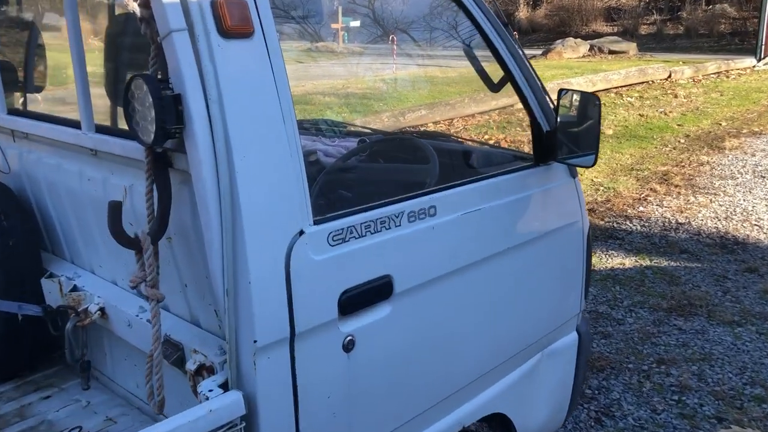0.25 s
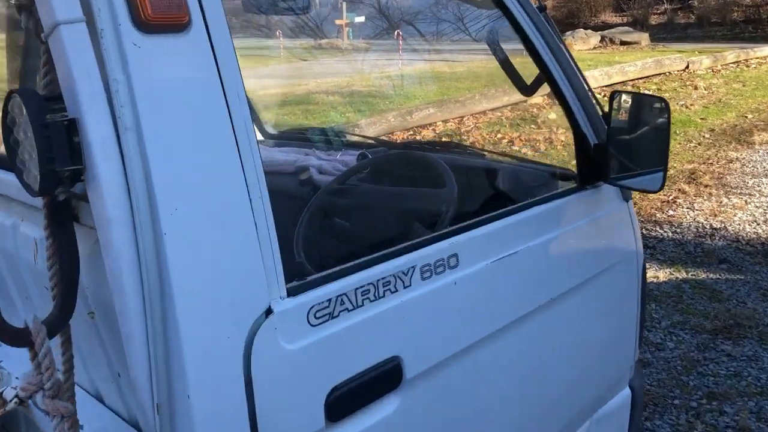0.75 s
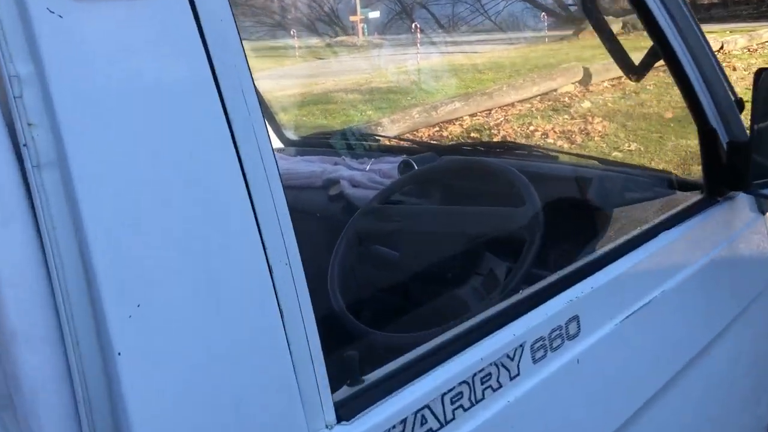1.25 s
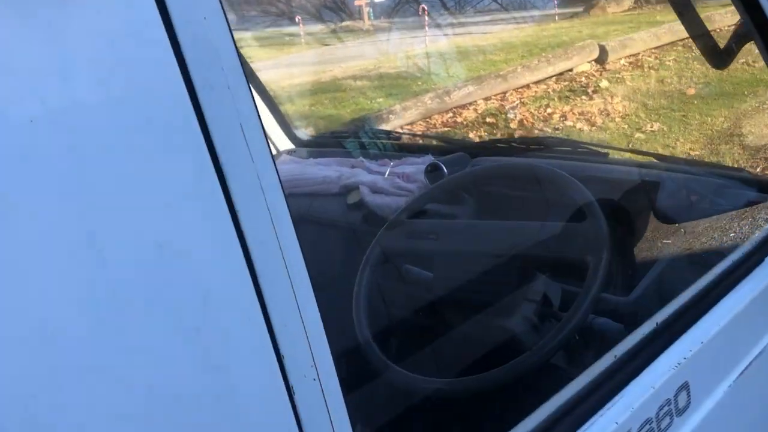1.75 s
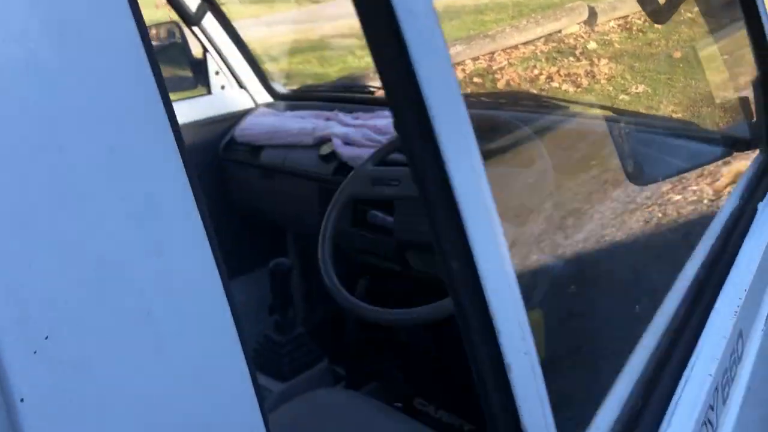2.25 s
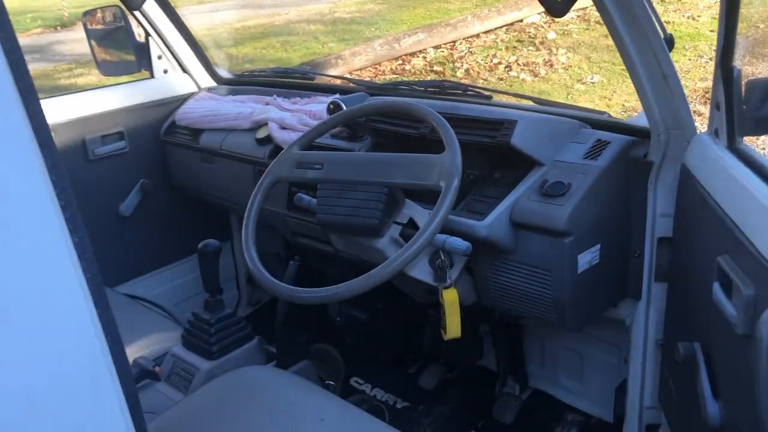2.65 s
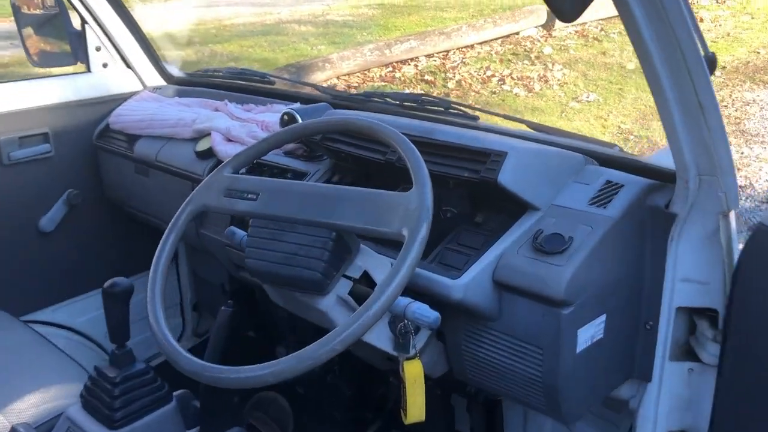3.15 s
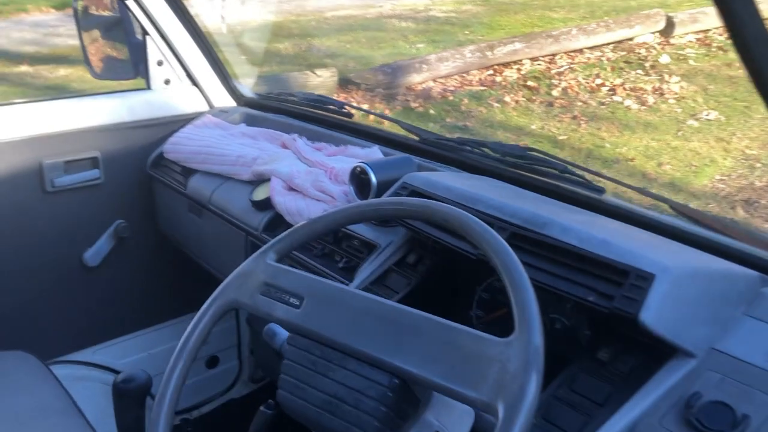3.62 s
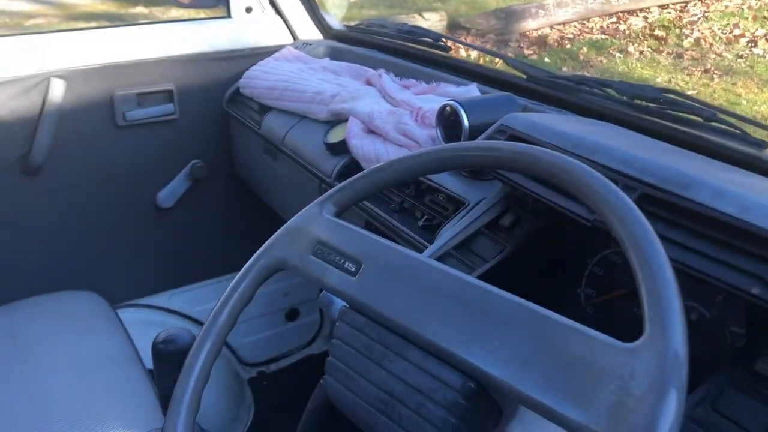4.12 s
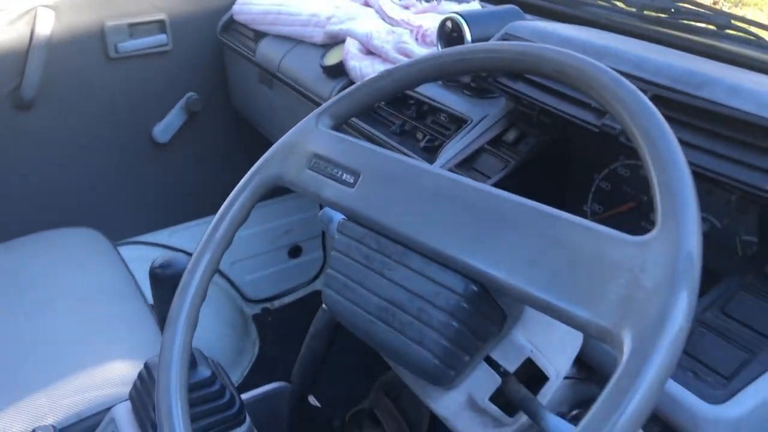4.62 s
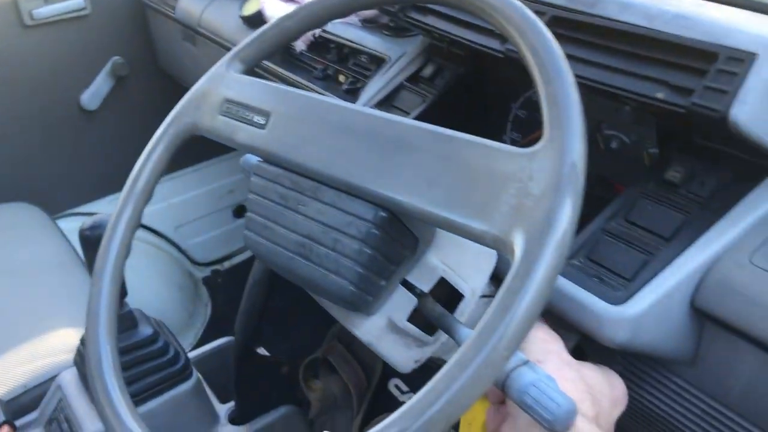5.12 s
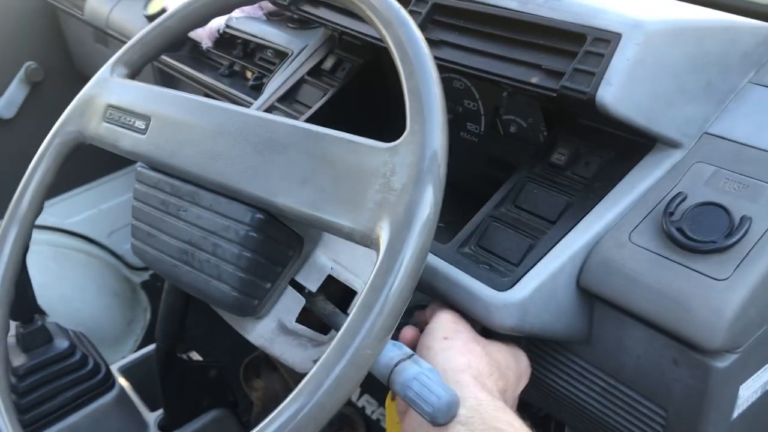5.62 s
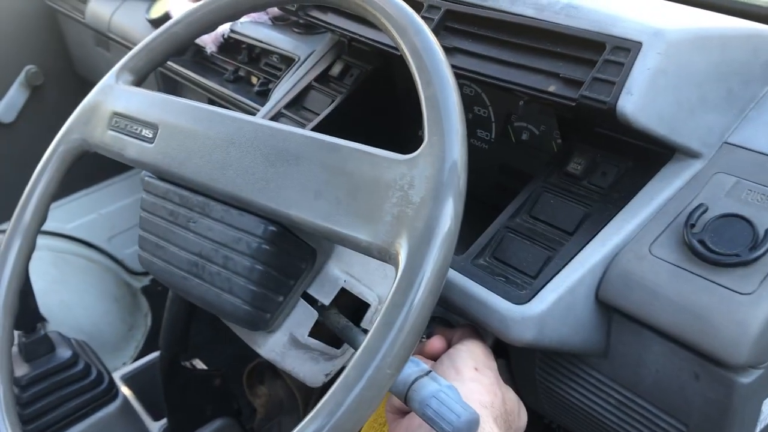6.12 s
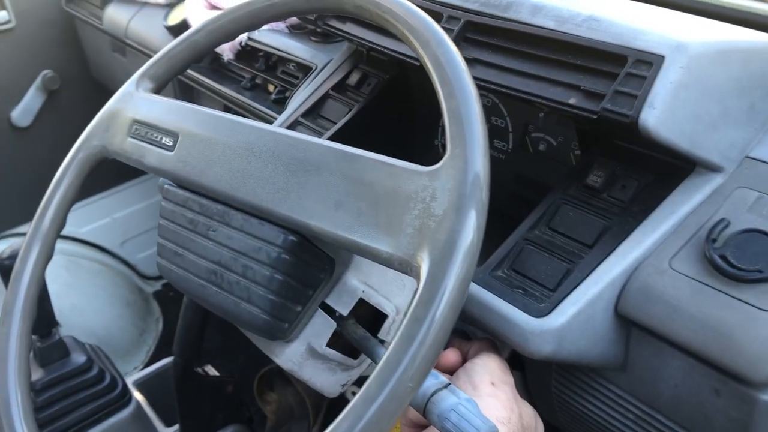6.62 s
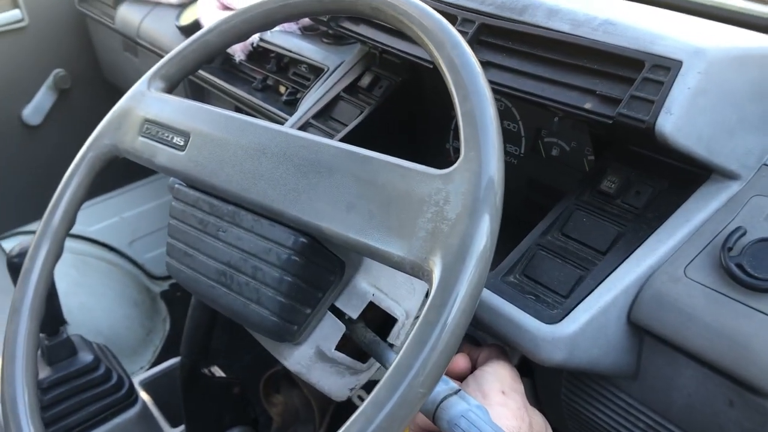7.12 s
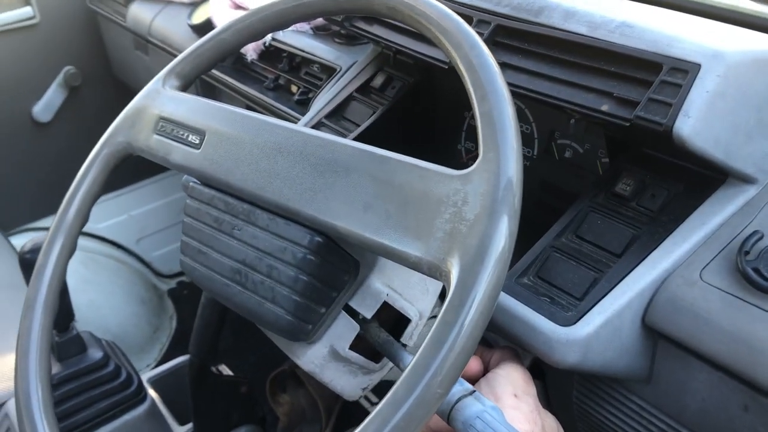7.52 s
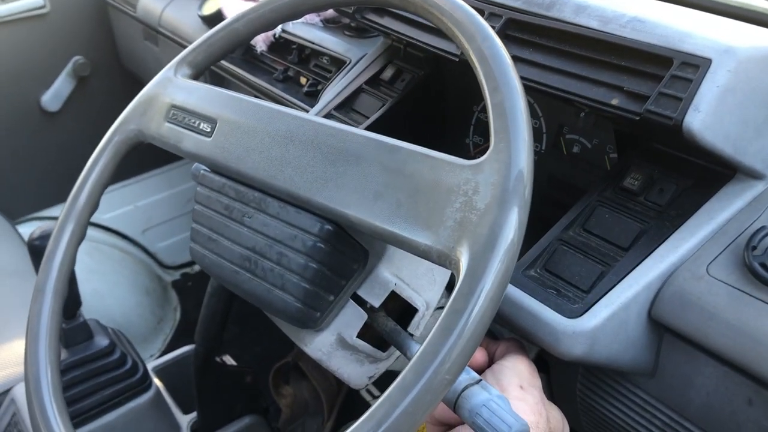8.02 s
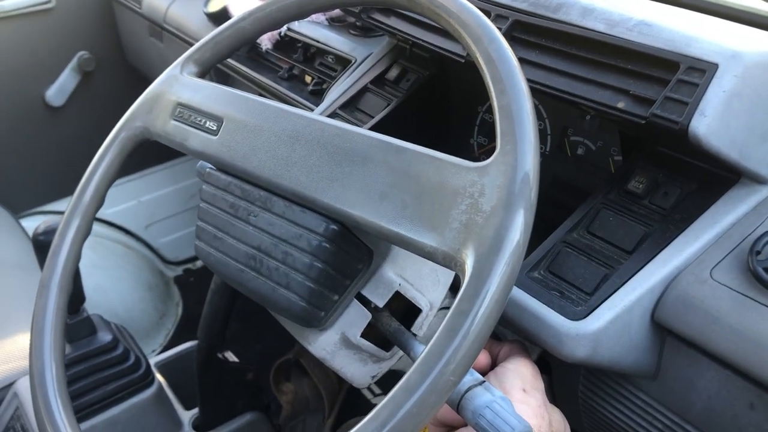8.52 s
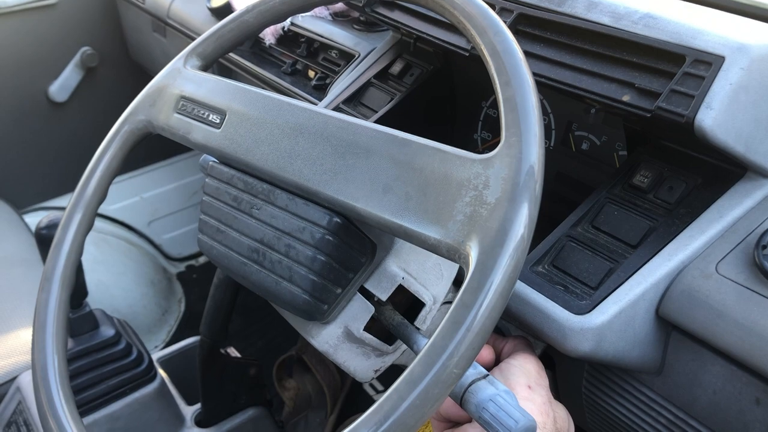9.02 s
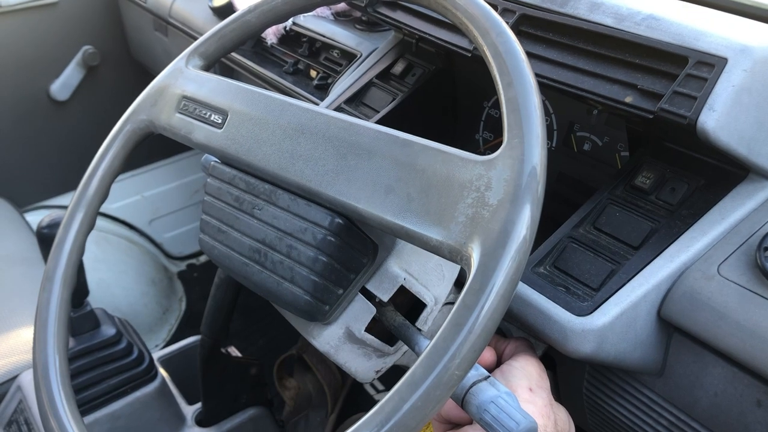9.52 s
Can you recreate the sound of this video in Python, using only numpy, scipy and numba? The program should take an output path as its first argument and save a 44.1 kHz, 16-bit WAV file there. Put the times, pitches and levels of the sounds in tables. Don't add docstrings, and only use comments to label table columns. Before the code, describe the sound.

Close handheld microphone in a quiet open yard. Gravel crunches underfoot while geese honk far away. A door latch releases with a very loud metallic bang, the door swings and knocks against its stop, then bumps, rustling and seat creaks follow. The starter clunks in, whirs and grinds in uneven surges, bogs down and stalls, then heaves briefly two more times without the engine catching.

```python
import sys
import numpy as np
from scipy import signal
from scipy.fft import rfft, irfft
from scipy.io import wavfile
from scipy.ndimage import uniform_filter1d
from numba import njit

SR = 44100
rng = np.random.default_rng(int(sys.argv[2]) if len(sys.argv) > 2 else 0)


def dump_mix(stems):
    frames = np.atleast_2d(stems).T
    limited = np.clip(frames, -1, 1)
    pcm = np.round(limited * 32767).astype(np.int16)
    wavfile.write(sys.argv[1], SR, pcm)


def voltage_ratio(level):
    return 10 ** (np.asarray(level, float) / 20)


N = 430416
T = np.arange(N) / SR


def level(x, db):
    return x * voltage_ratio(db) / np.sqrt(np.mean(x ** 2))


@njit
def svf(x, hz, width):
    y, b, l = np.empty(len(x)), 0., 0.
    g, k = np.tan(np.pi * hz / SR), width / hz
    for i in range(len(x)):
        v = (b + g * (x[i] - l)) / (1 + g * (g + k))
        b, l, y[i] = 2 * v - b, l + 2 * g * v, k * v
    return y


def band(x, hz, width):
    return level(svf(svf(x, hz, width), hz, width), 0)


def colour(x, points):
    hz, db = np.transpose(points)
    log_f = np.log(np.maximum(np.arange(len(x) // 2 + 1) * SR / len(x), 1))
    curve = voltage_ratio(np.interp(log_f, np.log(hz), db))
    return level(irfft(rfft(x) * curve, len(x)), 0)


def walk(rate, count=N):
    k = int(SR / rate)
    held = np.repeat(rng.standard_normal(count // k + 1), k)
    return 1.55 * uniform_filter1d(uniform_filter1d(held, k), k)[:count]


def body(x, modes, sway_db=0):
    out = np.zeros(len(x))
    for k, (hz, width, db) in enumerate(modes):
        gain = voltage_ratio(db + sway_db * walk(22, count=len(x)))
        out += (-1) ** k * gain * svf(x, float(hz), max(float(width), 4.0))
    return level(out, 0)


def grains(count, spread_db):
    size_db = spread_db * np.minimum(rng.exponential(size=count), 7)
    return level(rng.standard_normal(count) * voltage_ratio(size_db), 0)


def fade(t, t60):
    return np.exp(-np.log(1000) * t / max(t60, .004))


def ring(t, modes):
    y = np.zeros(len(t))
    for hz, db, t60 in modes:
        y += voltage_ratio(db) * fade(t, t60) * np.sin(2 * np.pi * (hz * t + rng.random()))
    y *= np.minimum(t / 0.0012, 1)
    return y / np.abs(y).max()


def spray(t, t60):
    tint_db = 3.5 * rng.standard_normal(4)
    points = [(900, -17.0), (2500, 2), (7000, 1), (16000, -6.5)]
    grit = colour(grains(len(t), 2.2), np.add(points, np.outer(tint_db, [0, 1])))
    return grit * fade(t, t60) * np.minimum(t / 0.0029, 1)


def add(out, s, x):
    i = int(s * SR)
    out[i:i + len(x)] += x[:N - i]


def yard():
    # hz, level_db [dB per Hz]
    yard_curve = [(50, -4.5), (100, 2), (220, -4), (450, -11.5), (600, -16.5), (2000, -24.5), (8000, -32.5),
                  (15500, -36.5)]
    # time_s, level_db
    gusts = [(0, -67), (.65, -59.5), (1.3, -64), (2.8, -62), (3.9, -60), (5.6, -68), (5.87, -52.5),
             (6.1, -60.5), (9.0, -66.5), (9.12, -56), (9.76, -69)]
    s, db = np.transpose(gusts)
    gust_db = np.interp(T, s, db) + 2.2 * walk(5.5)
    wind = band(rng.standard_normal(N), 58., 60.) * voltage_ratio(gust_db)
    drift_db = .6 * walk(3)
    return colour(rng.standard_normal(N), yard_curve) * voltage_ratio(-65 + drift_db) + wind


def insect():
    # start_s, pitch_hz, width_hz
    trill = (9.38, 9000, 350)
    start, hz, width = trill
    tone = band(rng.standard_normal(N), float(hz), float(width))
    return tone * voltage_ratio(-90.5 + 3.1 * walk(12)) * (T > start)


def geese():
    # start_s, length_s, pitch_hz, level_db
    honks = [(0.03, 0.079, 758, -62.5), (0.3, 0.086, 759, -66.5), (.47, 0.12, 759, -61),
             (.76, 0.086, 735, -67.5), (0.93, 0.077, 749, -61.5), (1.28, 0.098, 727, -68),
             (.02, 0.046, 1060, -60.5), (.3, 0.05, 1133, -60.5), (.75, 0.055, 1048, -63),
             (.9, 0.049, 1080, -61.5), (1.38, 0.12, 1107, -69)]
    harmonics_db = [1, 6, -12.5]
    arch, sag, roughness = .05, .07, .3
    out = np.zeros(N)
    for s, length, pitch_hz, db in honks:
        t = T[:int(length * SR)]
        swell = np.sin(np.pi * t / length)
        hz = pitch_hz * (1 + arch * (swell - .6) - sag * (t / length - .5))
        phase = 2 * np.pi * np.cumsum(hz) / SR
        voice = np.zeros(len(t))
        for k, harmonic_db in enumerate(harmonics_db):
            if k == 0 or pitch_hz < 900:
                voice += voltage_ratio(harmonic_db) * np.sin((k + 1) * phase)
        hoarse = 1 + roughness * band(rng.standard_normal(9000), 70., 120.)[:len(t)]
        add(out, s, voltage_ratio(db) * voice * hoarse * swell)
    t = T[:16000]
    field = level(rng.standard_normal(len(t)) * fade(t, 1.0), -45.0)
    return out + signal.fftconvolve(out, field)[:N]


def scuffing():
    # start_s, hold_s, body_db, hiss_db
    drags = [(0, 1.54, -64, -79), (0.471, 0.093, -54.5, -64), (1.068, 0.23, -56, -61.5),
             (1.4, 0.062, -60.5, -66), (1.615, 0.02, -45.5, -44), (1.624, .03, -43.5, -55),
             (1.687, 0.22, -56.5, -69), (2.0, 1.7, -64.5, -77), (2.65, 0.43, -64.5, -75.5),
             (3.089, 0.22, -52.5, -58), (3.113, 0.024, -47, -50.5), (2.577, 0.095, -59.5, -63.5),
             (3.567, 0.1, -49, -50.5), (3.675, 0.655, -63.5, -67.5), (3.841, 0.29, -57, -62.5),
             (4.505, 0.43, -67.5, -70), (4.943, 0.53, -74, -72), (5.16, 0.23, -67, -68.5),
             (5.73, 0.19, -53.5, -63)]
    attack_s, t60_s = 0.046, 0.12
    low = high = 0
    for s, hold, body_db, hiss_db in drags:
        swell = np.clip((T - s) / attack_s + 1, 0, 1) ** 2
        shape = swell * fade(np.maximum(T - s - hold, 0), t60_s)
        low = np.maximum(low, voltage_ratio(body_db) * shape)
        high = np.maximum(high, voltage_ratio(hiss_db) * shape)
    rustle = band(grains(N, 3.2), 730.0, 1200.0) * voltage_ratio(1.7 * walk(24.87))
    grit = colour(grains(N, 3.6), [(1500, -4.5), (3000, -5), (9000, -2.5), (15000, -8.5)])
    return low * rustle + high * grit * voltage_ratio(1.9 * walk(40))


def ticks():
    # time_s, peak_db
    bright = [(0.471, -33.5), (0.5895, -31.5), (1.3769, -42), (1.6025, -35), (1.62, -28.5), (1.6863, -34.5),
              (1.721, -37), (1.747, -37.5), (1.843, -37), (1.8254, -31), (1.895, -29), (1.9366, -32),
              (2.6444, -25), (3.487, -49), (3.5646, -30.5), (3.7684, -36.5), (3.8825, -35), (4.08, -38),
              (4.206, -39.5), (4.2292, -39.5), (4.4785, -17), (4.6256, -38.5), (4.8341, -38.5),
              (5.5179, -52), (5.5628, -45.5), (8.6383, -57.5), (8.6702, -59)]
    out, t = np.zeros(N), T[:2000]
    for s, db in bright:
        add(out, s, voltage_ratio(db - 10.5) * band(grains(len(t), 1.5), 10000.0, 19000.0) * fade(t, .03))
    return out


def thuds():
    # time_s, peak_db, ring_hz
    blows = [(0.489, -48.5, 217), (0.583, -45.5, 223), (1.251, -48, 314), (1.605, -41.5, 208),
             (1.785, -35.5, 207.2), (1.824, -36.5, 188.5), (1.904, -30, 327.4), (2.282, -43.5, 259.6),
             (2.65, -33.5, 209.6), (2.749, -43.5, 318.4), (2.79, -44.5, 129.3), (2.835, -43, 79.4),
             (2.94, -45.5, 159.4), (4.49, -50, 170.3), (3.961, -48, 139.6), (3.107, -45, 200),
             (3.346, -41, 342.6), (3.571, -43, 306), (3.615, -44, 323), (3.767, -42.5, 198),
             (4.63, -44, 144.4), (5.733, -41.5, 207), (5.82, -34.5, 221)]
    out, t = np.zeros(N), T[:20000]
    for s, db, hz in blows:
        panel = band(rng.standard_normal(len(t)), float(hz), 69.0)
        panel += band(rng.standard_normal(len(t)), 180.0, 340.0)
        add(out, s, voltage_ratio(db - 6.5) * panel * fade(t, 0.47) * np.minimum(t / 0.0061, 1))
    return out


def knocks():
    stones = [(0.459, -40, 961, -58), (0.492, -33, 680, -52), (0.524, -34, 725, -60),
              (0.585, -29, 603, -63), (0.665, -39, 720, -73), (1.103, -36, 820, -48),
              (1.16, -42.5, 606, -50.5), (1.254, -31.5, 770, -45.5), (1.371, -42, 810, -71),
              (1.595, -39, 1283, -48), (1.699, -46, 727, -68), (1.764, -39, 619, -51),
              (1.788, -33, 1950, -47.5), (1.826, -34.5, 655, -48)]
    swing = [
        (2.283, -39.5, 723, -78),
        (2.308, -37.5, 495, -67),
        (2.412, -46, 1590, -64.5),
        (2.467, -35, 1013, -61),
        (2.632, -35, 1630, -46.5),
        (2.648, -19.5, 2040, -28),
    ]
    lean = [(3.037, -39, 1320, -70), (3.073, -39, 1830, -52), (3.114, -40, 887, -51),
            (3.189, -29.5, 1277, -65), (3.21, -29, 846, -65), (3.228, -27.5, 1540, -47.5),
            (3.29, -48, 828, -61), (3.314, -32, 880, -69), (3.343, -23, 1028, -72), (3.446, -40, 1010, -70),
            (3.537, -37, 990, -53), (3.564, -30, 615, -37.5), (3.608, -20, 947, -39.5),
            (3.64, -28, 1020, -38.5), (3.669, -31, 1454, -44)]
    lock = [(4.444, -49, 616, -50.5), (4.48, -32.5, 1330, -32), (4.588, -30, 1540, -44),
            (4.626, -22.5, 1098, -30.5), (5.029, -50.5, 1890, -64), (5.142, -45, 782, -68),
            (5.709, -56, 620, -53.5), (5.744, -32.5, 1025, -53.5), (5.8, -21, 1668, -31.5),
            (5.815, -17, 783, -30), (8.535, -33.5, 1944, -43)]
    decays = [
        0.073,
        0.12,
        0.081,
        .1,
    ]
    out, t = np.zeros(N), T[:9000]
    for rows, t60 in zip((stones, swing, lean, lock), decays):
        for s, db, hz, crunch_db in rows:
            partials = [(hz * ratio, -5, .5 * t60) for ratio in rng.uniform(.6, 1.9, 4)]
            rings = ring(t, [(hz, 0, 0.66 * t60)] + partials)
            rattle = band(grains(len(t), 2.5), 840.0, 1400.0) * fade(t, 1.47 * t60)
            add(out, s, voltage_ratio(db - 6.0) * (rings + 0.34 * rattle) + voltage_ratio(crunch_db - 1.5) * spray(t, t60))
    return out


def snaps():
    # time_s, peak_db, ring_hz, crunch_db
    contacts = [(0.459, -37, 966, -60), (1.649, -37.5, 923, -60), (1.699, -40.5, 736, -60),
                (1.765, -33, 1970, -60), (2.283, -42, 708, -60), (2.308, -34.5, 1060, -60),
                (2.467, -32, 1005, -63), (2.482, -46, 735, -58), (2.572, -47, 1140, -60),
                (2.593, -54, 791, -57), (2.629, -24.5, 1684, -55), (2.659, -24.5, 2070, -60),
                (2.679, -29, 923, -60), (2.719, -45, 891, -60), (3.096, -39, 1820, -60),
                (3.102, -36.5, 838, -60), (3.122, -33, 839, -60), (3.138, -33.5, 793, -60),
                (3.189, -29, 1313, -60), (3.229, -26, 1536, -60), (3.244, -33, 1320, -60),
                (3.291, -36, 956, -60), (3.344, -21, 978, -65), (3.357, -30.5, 1483, -63),
                (3.899, -33.5, 1490, -60), (4.161, -36, 1367, -67), (4.58, -31, 1580, -50),
                (5.824, -22.5, 1034, -60), (5.833, -24.5, 1500, -60), (5.844, -27, 1070, -60),
                (5.855, -28, 1020, -60), (8.759, -50, 1320, -72)]
    out, t, t60 = np.zeros(N), T[:4000], .014
    for s, db, hz, crunch_db in contacts:
        rings = ring(t, [(hz, 0, t60), (1.4 * hz, -5, .7 * t60), (.63 * hz, -9, 2.0 * t60)])
        add(out, s, voltage_ratio(db - 5.0) * rings + voltage_ratio(crunch_db) * spray(t, .05))
    return out


def panels():
    # time_s, peak_db, ring_hz, t60_s
    hollow = [(1.912, -26, 760, .16), (1.935, -30, 690, .16), (1.765, -46, 2700, .03),
              (1.789, -33, 1944, .05), (2.66, -34, 1900, .12), (2.632, -36, 2900, .03),
              (4.632, -36, 560, .08), (4.447, -50, 3300, .07), (4.732, -54, 3300, .12),
              (8.925, -45.5, 1980, .08), (.472, -42, 1050, .04), (.511, -42, 900, .03)]
    out, t = np.zeros(N), T[:9000]
    for s, db, hz, t60 in hollow:
        modes = [(hz, 0, t60), (1.09 * hz, -3, .8 * t60), (.9 * hz, -5, 0.7 * t60)]
        add(out, s, voltage_ratio(db) * ring(t, modes))
    return out


def seat():
    # time_s, peak_db, crunch_db
    creaks = [(3.744, -45.5, -55), (3.773, -32, -40), (3.883, -42, -38.5), (3.891, -33.5, -39),
              (3.929, -43, -52), (3.962, -30.5, -41), (4.007, -40, -48), (4.02, -40, -54),
              (4.048, -39, -48.5), (4.095, -33, -51.5), (4.156, -36.5, -66), (4.235, -32, -66),
              (4.305, -48, -61), (4.731, -55, -60), (4.784, -53, -64), (4.835, -51, -43), (4.869, -48, -62),
              (4.905, -46.5, -57.5)]
    # hz, level_db, share of decay
    frame = [(614, -2, 1.1), (1100, -2, .6), (1390, 0, .8), (1860, -2, .5), (2280, -10, .4),
             (3310, -12, .4)]
    out, t, t60 = np.zeros(N), T[:9000], 0.079
    for s, db, crunch_db in creaks:
        for lag_s, rebound_db in ((0, 3), (.017, -6)):
            modes = []
            for hz, mode_db, share in frame:
                detuned_hz = hz * (1 + .04 * rng.standard_normal())
                modes.append((detuned_hz, mode_db + 4 * rng.standard_normal(), share * t60))
            rattle = band(grains(len(t), 3.5), 1200.0, 1470.0) * fade(t, 0.9 * t60)
            add(out, s + lag_s, voltage_ratio(db - 3 + rebound_db) * (ring(t, modes) + 0.24 * rattle))
        add(out, s, voltage_ratio(crunch_db - 4.5) * spray(t, 1.6 * t60))
    return out


def buckle_and_keys():
    # time_s, peak_db
    chimes = [
        (4.146, -52.5),
        (4.232, -48.5),
    ]
    # time_s, peak_db
    jingle = [
        (8.555, -39),
        (8.582, -46),
    ]
    # hz, level_db, t60_s
    key_modes = [(393, 0, .16), (781, -10, .14), (1943, -16, .12), (3295, -20, .1), (4980, -21, .14),
                 (6185, -18, .17)]
    out, t = np.zeros(N), T[:9000]
    for s, db in chimes:
        add(out, s, voltage_ratio(db) * ring(t, [(6850, 0, 0.068), (12800, -2.5, .07)]))
    for s, db in jingle:
        add(out, s, voltage_ratio(db) * ring(t, key_modes))
    return out


def latch():
    # time_s, peak_db
    hits = [
        (1.895, -9.5),
        (1.902, -0.5),
        (1.917, -15.5),
        (1.925, -14),
        (1.94, -20.5),
    ]
    # hz, level_db, t60_s
    striker = [(1540, -11, 0.075), (1760, 9, 0.013), (1969, 5, 0.024), (2222, -14, .04), (1190, -10, 0.017)]
    # hz, width_hz, level_db
    door = [(619, 48, 2), (810, 29, 11), (1080, 54, -3.5), (1234, 35, -10), (1635, 56, -0.5),
            (1780, 37, -4), (1890, 66, -3.5), (2298, 10, -18.5), (3525, 120, -24.5)]
    out, t = np.zeros(N), T[:20000]
    for s, db in hits:
        crack = grains(len(t), 1.5) * fade(t, 0.048)
        add(out, s, voltage_ratio(db) * (0.6 * ring(t, striker) + 0.0488 * svf(crack, 4000., 7000.)))
    shake = grains(len(t), 2.5)
    skin = body(shake, door) + 1.2 * band(shake, 900., 1400.)
    blow_s = hits[1][0]
    add(out, blow_s, voltage_ratio(-22.0) * skin * (fade(t, 0.17) + 0.054 * fade(t, 0.48)))
    add(out, 2.655, voltage_ratio(-41.5) * skin[::-1] * fade(t, 0.35))
    return out


def belt():
    # start_s, length_s, from_hz, to_hz
    squeak = (7.14, .045, 12800, 9900)
    s, length, from_hz, to_hz = squeak
    out, t = np.zeros(N), T[:int(length * SR)]
    hz = to_hz + (from_hz - to_hz) * (1 - t / length) ** 2
    rough = band(rng.standard_normal(len(t)), 500., 900.)
    tone = np.sin(2 * np.pi * np.cumsum(hz) / SR)
    add(out, s, voltage_ratio(-53.5) * rough * tone * np.sin(np.pi * t / length))
    return out


@njit
def teeth(hz, stretch, size):
    pulses, phase, p, k = np.zeros(len(hz) + 1), np.empty(len(hz)), 0., 0
    for i in range(len(hz)):
        step = hz[i] * stretch[k] / SR
        p += step
        if p >= 1:
            p, k = p - 1, k + 1
            pulses[i] += size[k] * p / step
            pulses[i + 1] += size[k] * (1 - p / step)
        phase[i] = p
    return pulses[:-1], phase


def crank(start, release, first_hz, swell):
    # fastest_s, top_hz, slowest_s, low_hz [mesh rates], effort_db
    strokes = [
        (5.9, 229.3, 6.04, 145, 0),
        (6.163, 268.1, 6.275, 199.6, 0.5),
        (6.366, 265.6, 6.475, 195.4, 0),
        (6.57, 266.5, 6.685, 198, 0.5),
        (6.78, 267.9, 6.9, 201.6, -0.5),
        (7.0, 255, 7.14, 143.2, 0),
        (7.272, 256.7, 7.75, 118.9, -1),
        (8.245, 271.5, 8.62, 120.2, -3),
        (9.018, 274.7, 9.5, 125.9, -2.5),
    ]
    # level_db at the loudest rate, that rate_hz, loss below and above it [dB per Hz],
    # gain on slowing [dB per kHz/s]
    loudness = [
        (-38, 204.4, 0.15, 0.14, 2),
        (-46, 229.3, 0.3, 0.12, 5),
        (-41.5, 254, 0.19, .01, 0.5),
    ]
    coast_loss = [
        36,
        85,
        90,
    ]
    stall_loss = [
        13,
        22.5,
        33,
    ]
    surge_s, dwell_s, sag_s, coast_s = .19, .04, .24, 0.48
    t = T[int(start * SR):int((release + coast_s) * SR)]
    rows = [row for row in strokes if start < row[0] < release]
    turns = [(start, first_hz)]
    for fast, top_hz, slow, low_hz, _ in rows:
        last_s, last_hz = turns[-1]
        turns.append((max(last_s, fast - surge_s), last_hz))
        turns += [(fast - dwell_s, .98 * top_hz), (fast + dwell_s, top_hz)]
        turns.append((min(slow, fast + sag_s), low_hz))
    hz = uniform_filter1d(np.interp(t, *np.transpose(turns)), size=1000)
    slope = uniform_filter1d(np.gradient(hz), size=1000) * SR / 1000
    slowing = np.clip(-slope, -1, 1)
    effort_db = np.interp(t, *np.transpose(rows)[[0, 4]])
    edge = np.minimum(np.minimum((t - start) / swell, (t[-1] - t) / 0.046), 1)
    levels_db = []
    for (db, best_hz, below, above, load), coast, stall in zip(loudness, coast_loss, stall_loss):
        too_slow = np.minimum(below * np.maximum(best_hz - hz, 0), stall)
        too_fast = above * np.maximum(hz - best_hz, 0)
        run_out = coast * np.maximum(t - release, 0)
        levels_db.append(db - too_slow - too_fast + load * slowing + effort_db - run_out)
    return t, hz, edge, effort_db + 22 * np.minimum(slowing, .1), levels_db


def mesh_whine(hz, effort_db):
    # harmonic, level_db
    whine_harmonics = [(1, -12), (2, -9), (3, -3), (4, -7), (5, -5), (6, -4), (7, -8), (9, -14), (11, -14),
                       (13, -16), (16, -17)]
    turn = 2 * np.pi * np.cumsum(hz) / SR
    whine = np.zeros(len(hz))
    for k, db in whine_harmonics:
        whine += voltage_ratio(db + 3 * walk(25, count=len(hz))) * np.sin(k * turn)
    whine = svf(whine, 803., 45.) + .6 * whine
    return whine * voltage_ratio(-45.5 + effort_db) * np.clip((hz - 205) / 60, 0, 1) ** 1.5


def starter():
    # bite_s, release_s, first_hz [mesh rate], swell_s
    tries = [
        (5.83, 7.411, 200, 0.0088),
        (7.993, 8.47, 110.2, 0.096),
        (8.655, 9.197, 114.8, 0.02),
    ]
    chatter_levels = [
        -51.5,
        -56,
        -60,
    ]
    # hz, width_hz, level_db
    cab = [(129, 10.58, 2.5), (146.3, 51, -3), (221, 11, 2.5), (311.5, 29, -2.5), (433, 56, -7),
           (540, 61, -15.5)]
    housing_modes = [(634, 46, -19), (809, 24, -1.5), (1060, 140, -5), (1198, 90, 4.5), (1540, 76, 1.5),
                     (1730, 16, 1.5), (1927, 30, -5.5)]
    gears = [(2440, 19, -9), (2794, 45, -8), (3074, 35, -6.5), (3545, 40, -3.5), (4080, 45, -9.5),
             (4410, 30, -7), (4510, 23, -9), (4900, 55, -14), (5615, 34, -16), (5990, 60, -9),
             (6520, 49, -13)]
    # hz, level_db [dB per Hz]
    grind_curve = [(1060, -8.5), (1800, -1.5), (2020, -8.5), (4090, -4.5), (5210, -10.5), (6180, -9),
                   (8320, -9.5), (15500, -18)]
    out = np.zeros(N)
    chance = rng.standard_normal((N // 100, 2)).T
    for turn_key, chatter_db in zip(tries, chatter_levels):
        release = turn_key[1]
        t, hz, edge, effort_db, (boom_db, housing_db, grind_db) = crank(*turn_key)
        pulses, phase = teeth(hz, 1 + .011 * chance[0], voltage_ratio(3 * chance[1]))
        pulses = level(pulses - pulses.mean(), 0) * np.clip((hz - 170) / 90, .15, 1)
        scrape = level(grains(len(t), 1.6) * (.5 + np.exp(-phase / 0.26)), 0)
        boom = body(pulses + .9 * scrape, cab)
        whine = mesh_whine(hz, effort_db)
        ringing = .8 * pulses + scrape
        housing = body(ringing, housing_modes, sway_db=3.0)
        housing = level(housing + 0.46 * band(ringing, 980.0, 1500.), 0)
        gear_ring = body(scrape + 0.4 * pulses, gears, sway_db=3.0)
        grind = level(colour(scrape, grind_curve) + 0.55 * gear_ring, 0)
        hiss = grind - svf(grind, 1670.0, 4500.0)
        gear_flicker = voltage_ratio(1.5 * walk(35)[:len(t)])
        hiss_flicker = voltage_ratio(1.5 * walk(35)[:len(t)])
        grind = (grind - hiss) * gear_flicker + hiss * hiss_flicker * voltage_ratio(0.6 * (grind_db + 36.5))
        rap_db = chatter_db + .06 * (hz - 170) + 1.6 * walk(30, count=len(t))
        rap_db = rap_db - 170 * np.maximum(t - release + .03, 0)
        chatter = band(scrape * grains(len(t), 1.5), 1100., 1100.) * voltage_ratio(rap_db)
        motor = voltage_ratio(boom_db) * boom + voltage_ratio(housing_db) * housing + voltage_ratio(grind_db) * grind
        add(out, t[0], edge * (chatter + motor + whine))
    return out


def scene():
    outside = yard() + insect() + geese()
    contacts = scuffing() + ticks() + thuds() + knocks() + snaps() + panels()
    cabin = seat() + buckle_and_keys() + latch()
    return (outside + contacts + cabin + belt() + starter())[None]


def top_cut(x):
    return signal.sosfilt(signal.butter(12, 16990, fs=SR, output="sos"), x)


def record(dry):
    # hz, gain_db
    tone_curve = [(20, -9.5), (40, 2.5), (12000, 0.5), (14800, 5.5), (15700, 8), (16100, -23.5), (16900, -19.5),
                  (17100, -63.5)]
    mix = colour(dry[0], tone_curve)[None] * np.std(dry)
    return top_cut(mix)


dry = scene()
out = record(dry)
dump_mix(out)
```